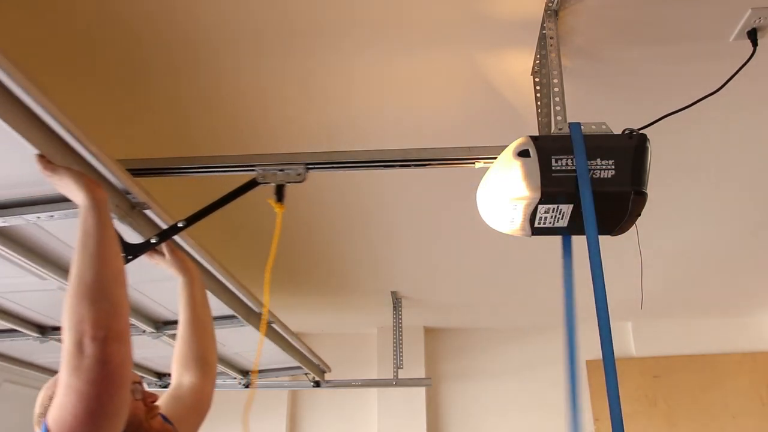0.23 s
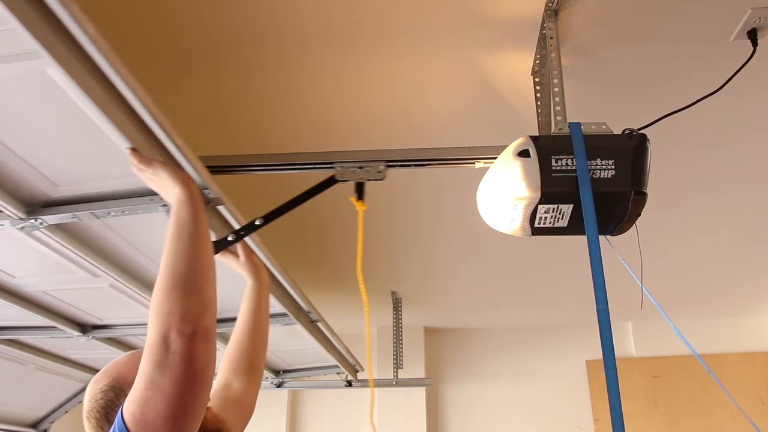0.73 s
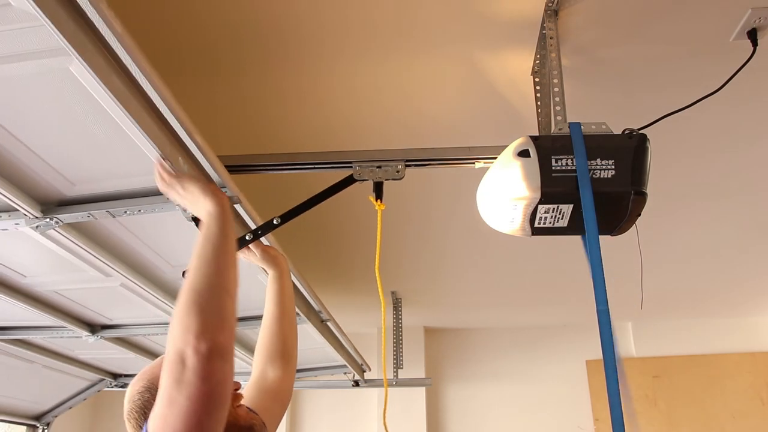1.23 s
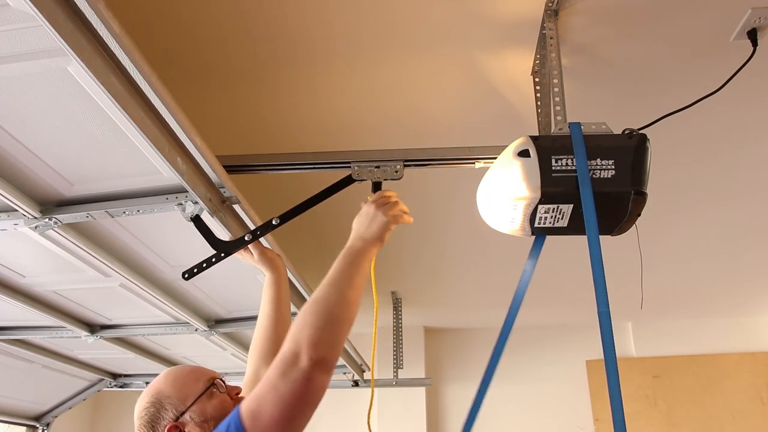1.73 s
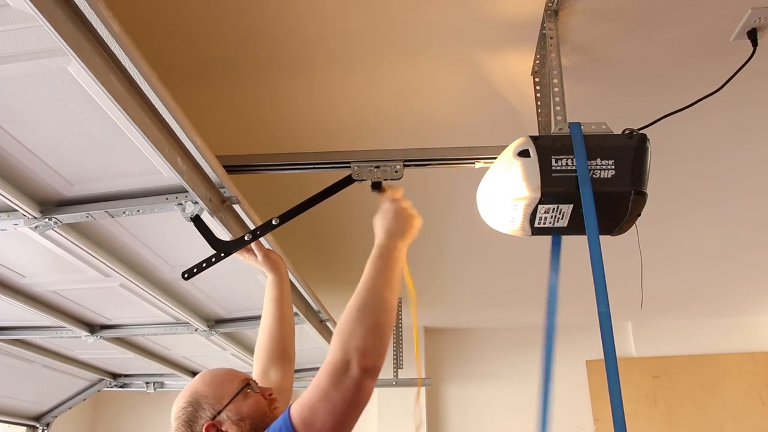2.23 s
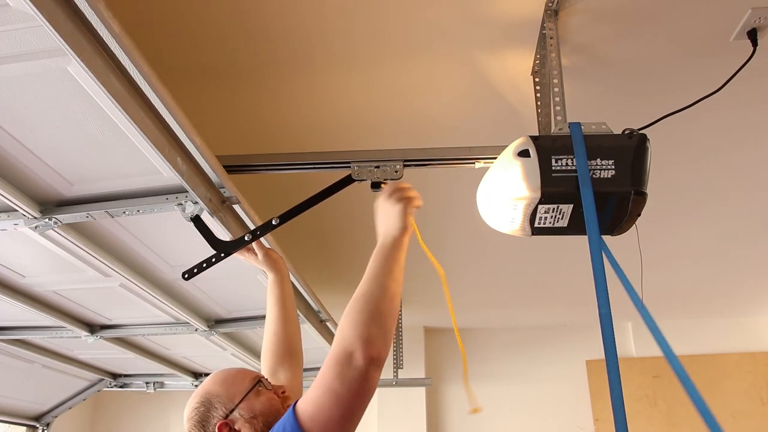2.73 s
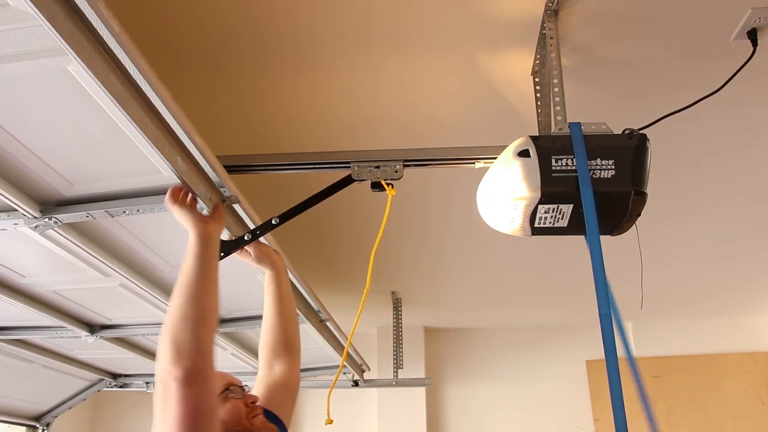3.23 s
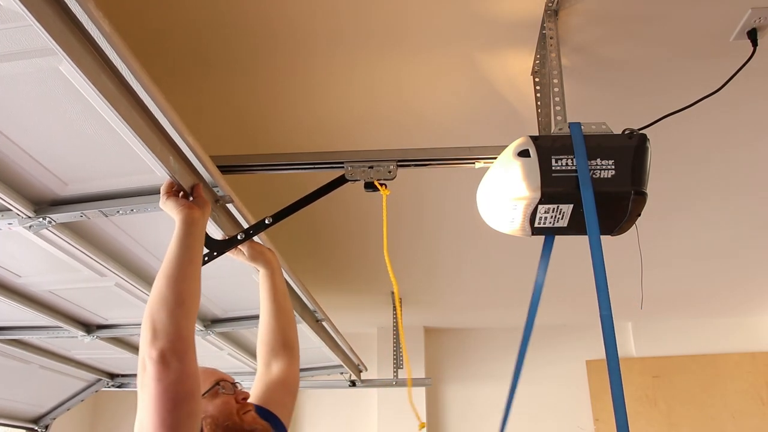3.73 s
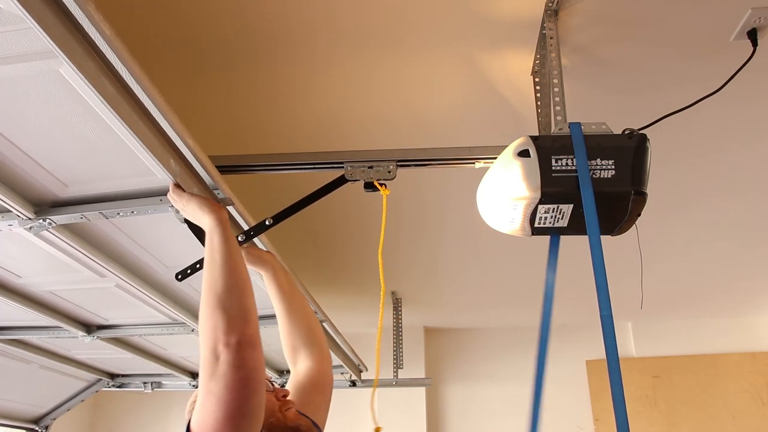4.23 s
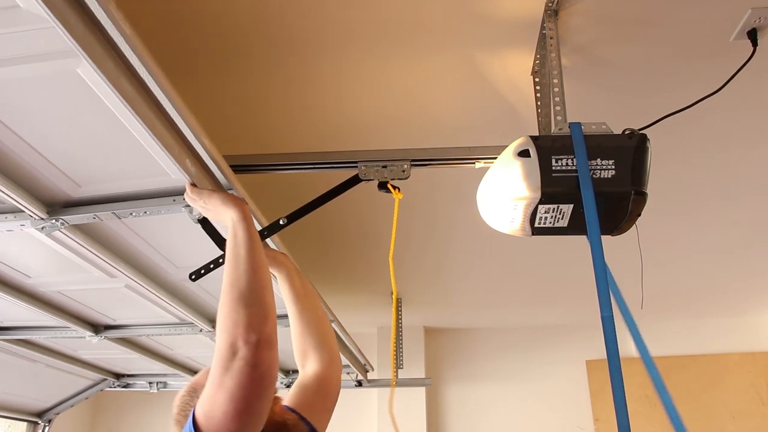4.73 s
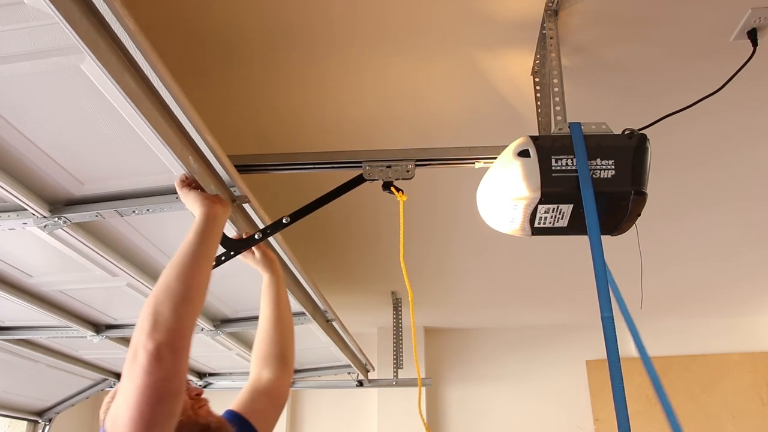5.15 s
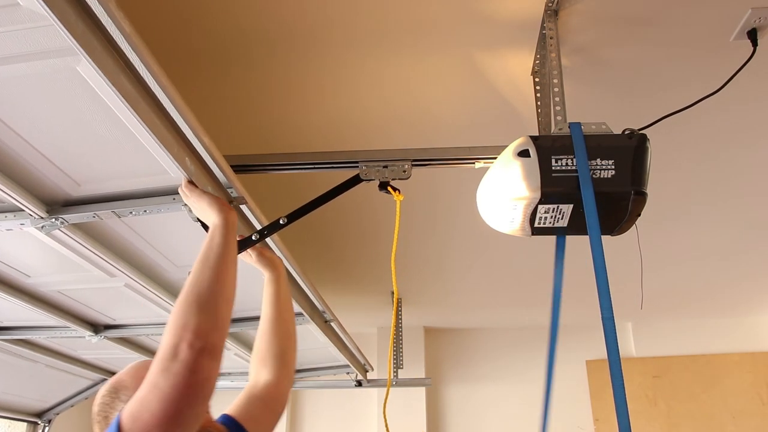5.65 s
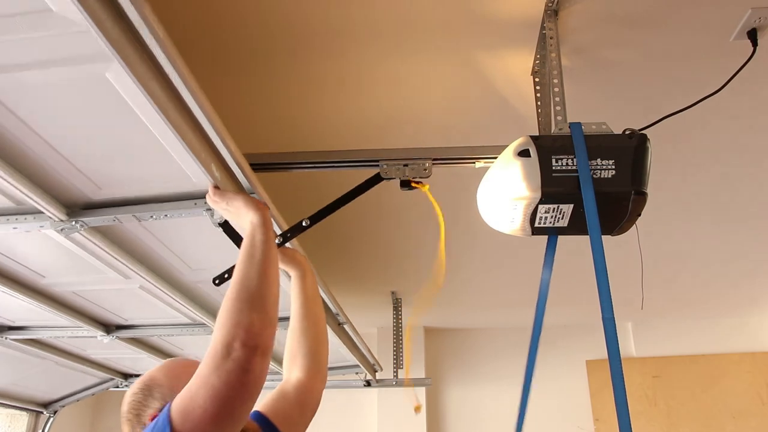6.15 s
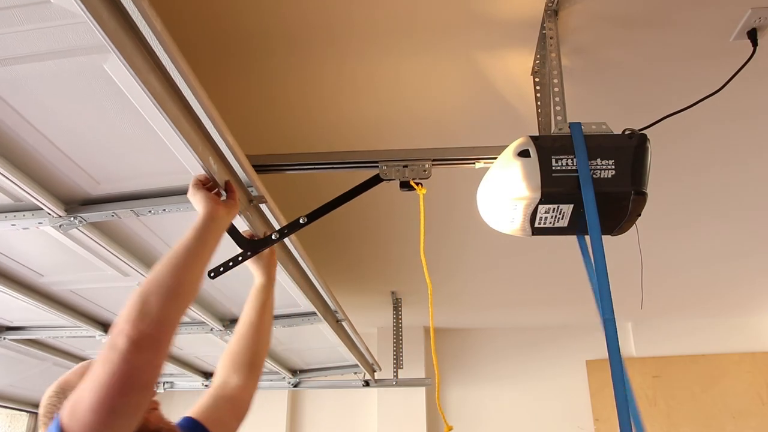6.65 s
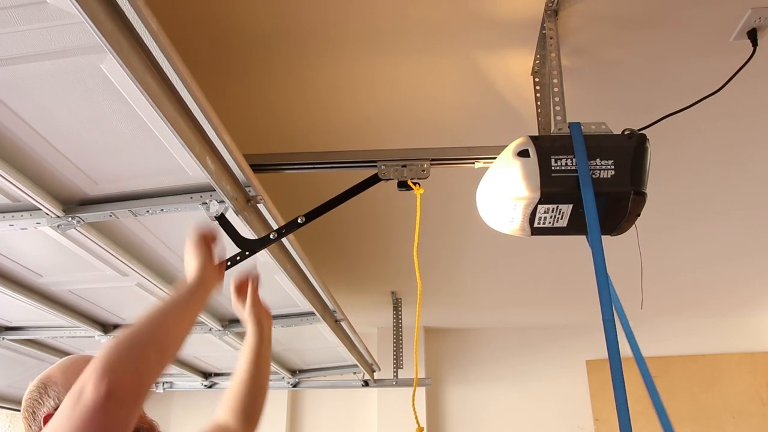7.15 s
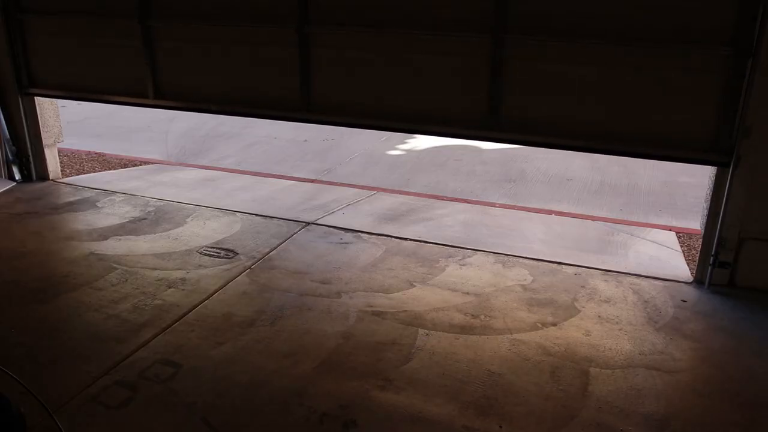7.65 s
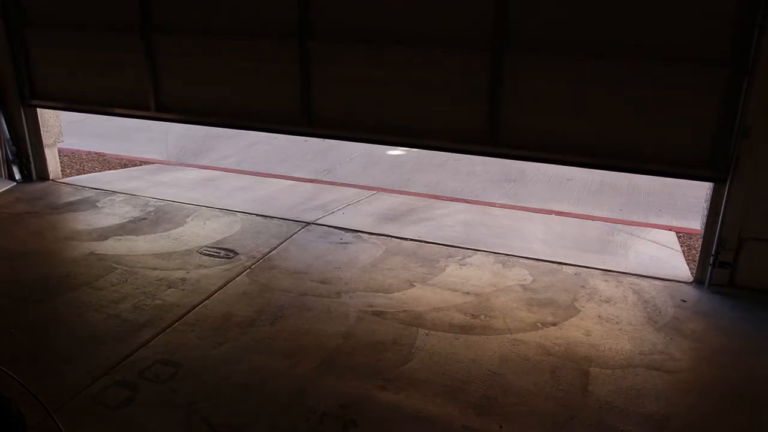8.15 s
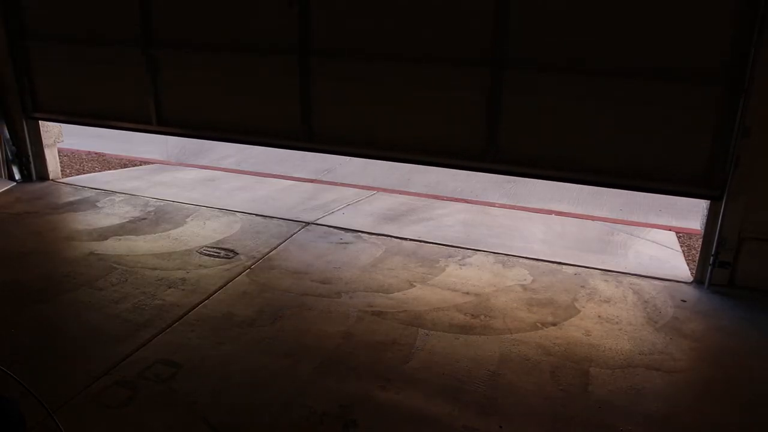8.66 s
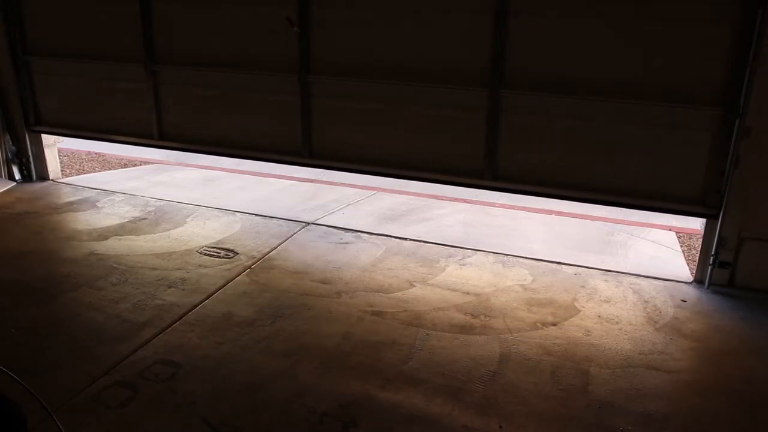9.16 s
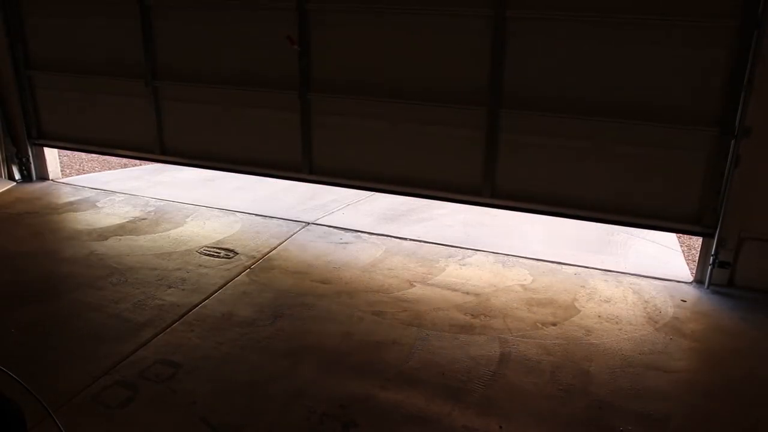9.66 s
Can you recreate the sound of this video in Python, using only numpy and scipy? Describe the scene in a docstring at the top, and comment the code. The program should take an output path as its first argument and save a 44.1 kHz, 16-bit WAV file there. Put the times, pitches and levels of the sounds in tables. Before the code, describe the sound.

Close indoor sound with short bright reverberation: rolling rumble and two hard knocks first, a quieter pause, then clicks and a crisp latch snap. Faint scrapes, small shoves and two pairs of clanking blows lead to one huge steel clunk and rattling slams. Rhythmic trolley ticks fade, and a motor drone with chain rattle takes over, steadily swelling, broken by knocks, a tiny squeak and roller grinding.

```python
"""Rollers rumble and hinges knock as a sectional steel garage door is pushed along overhead by hand.
Release latch and arm clank; then the trolley catches with a loud clunk and the panels shudder.
An electric opener follows, motor humming and chain rattling, and lowers the door in a bare, ringing garage.
Rolling is filtered noise from many small contacts; blows are noise bursts with decaying modes.
Friction is noise through resonances, the motor a set of wavering sines, and the walls a decaying noise tail."""
import sys
import numpy as np
from scipy import signal
from scipy.fft import rfft, irfft, next_fast_len
from scipy.io import wavfile
from scipy.ndimage import map_coordinates

SR = 44100
rng = np.random.default_rng(int(sys.argv[2]) if len(sys.argv) > 2 else 0)


def transcribe(signal):
    """Save signal, clipped to [-1, 1], as a 16-bit WAV file at the path in sys.argv[1]."""
    frames = np.atleast_2d(signal).T
    limited = np.clip(frames, -1, 1)
    pcm = np.round(limited * 32767).astype(np.int16)
    wavfile.write(sys.argv[1], SR, pcm)


N = 436149

CATCH_S, START_S = 6.15, 7.362  # the trolley catches; the opener starts
TOP_HZ = 16300  # upper band limit

# Decay of the walls' reverberation. Each row: frequency in Hz, t60 in s.
WALL_DECAY = [(100, 1), (300, 0.83), (800, 0.47), (2000, 0.56), (5000, 0.38), (13000, 0.3)]

# Spectra of blows, hand rolling, shuddering and chain drive. Each row: frequency in Hz, relative level in dB.
BLOW_SPECTRUM = [(60, -17), (130, 2.5), (265, 8), (600, 0), (1170, -4), (2100, -7.5), (2800, -12.5),
                 (3790, -10.5), (5050, -14), (6590, -16), (16000, -28)]
ROLL_SPECTRUM = [(15, -50), (25, -10.5), (92, 5.5), (130, 3), (249, -6), (405, -12), (641, -14.5),
                 (1480, -14), (2280, -23.5), (3620, -22), (4490, -31.5), (13600, -47.5), (16000, -56)]
SHAKE_SPECTRUM = [(15, -44), (25, -17), (48, -3), (110, -3), (223, -1.5), (405, 4), (640, -0.5), (820, 0),
                  (2280, -8.5), (3900, -7), (5730, -21.5), (7310, -23), (11000, -35), (16000, -33)]
CHAIN_SPECTRUM = [(15, -43), (25, -8.5), (64, 2), (256, -1), (293, 2.5), (350, -0.5), (405, -5),
                  (734, -11.5), (1260, -9), (2690, -24), (3750, -21), (4400, -31), (11300, -49.5),
                  (16000, -62)]
# Spectrum of the crack of a slipping hinge pin. Each row: frequency in Hz, relative level in dB.
PING_SPECTRUM = [(1000, 0), (4500, 2), (8000, -3), (13000, -2), (16000, -21)]

# Modes of panels, arm, hinge pin, latch, and trolley with rail.
# Each row: nominal frequency in Hz, mean relative level in dB, t60 in s.
PANEL_MODES = [(308, -9.5, 0.46), (401, -4, 0.79), (497, -1.5, 0.68), (790, 1.5, 0.67), (931, -14, 0.77),
               (1048, 1.5, 0.41), (1168, 2, 0.41)]
ARM_MODES = [(178.7, 8, 0.3), (1185, -5.5, 0.32), (1290, -8, 0.24), (1370, -5.5, 0.29), (1650, -8.5, 0.26),
             (1890, -12, 0.28), (2380, -6, 0.19), (3004, -19, .16), (5100, -15, 0.2), (5310, -17, 0.22),
             (6100, -19, 0.17), (7220, -12.5, 0.15)]
PIN_MODES = [(5100, -8, .07), (5200, 6, 0.082), (5320, -4, .25), (7530, -10, .15), (12220, -12, .28)]
LATCH_MODES = [(1213, -7.5, 0.37), (1275, -4.5, 0.41), (1337, 2.5, 0.24), (1400, 0.5, 0.22),
               (1986, -8, 0.27), (2623, -1.5, 0.14), (3900, -8, .14), (4370, -8, 0.11), (4990, -9, 0.14)]
TROLLEY_MODES = [(924, 8, .15), (1880, -1, 0.12), (2730, -8, 0.18), (2830, -2, 0.098), (3100, -2, 0.22),
                 (3540, -5, 0.28), (3780, -4, 0.64)]

# Resonances of opener housing and rail, of the rail under the trolley, of loose hardware, and of the track.
# Each row: centre in Hz, width in Hz of one pass (two are applied), relative level in dB.
HOUSING_RESONANCES = [(298, 38, -7), (352, 54, -4), (743, 260, -14)]
RAIL_RESONANCES = [(1550, 1680, 6.5), (3200, 610, 0), (7300, 2200, -7), (11200, 2300, -10.5)]
HARDWARE_RESONANCES = [(2545, 110, -0.5), (3045, 150, 0), (3510, 310, 1.5), (3760, 280, 0.5),
                       (4300, 240, -7)]
TRACK_RESONANCES = [(1000, 460, 1.5), (1450, 230, 3.5), (2020, 510, 0), (2750, 340, -1.5),
                    (3540, 930, -4.5)]

# Blows. Each row: start in seconds, mid-band level in dB, hardness in dB, centre of the favoured band in Hz.
# Dull knocks of hinges and rollers:
HINGE_KNOCKS = [(0.7277, -19.5, 6, 1780), (.736, -28, -9.5, 746), (0.8185, -25.5, 7, 1760),
                (1.0804, -36.5, -4, 2180), (3.266, -49.5, 7, 3650), (3.3273, -41.5, 6.5, 1650),
                (3.6052, -46.5, -6, 2000), (3.9444, -36.5, 0, 1600), (4.35, -51, 3, 1030),
                (5.0848, -38, 2, 1550), (7.3605, -34, 3, 3500), (7.7897, -31.5, 4, 2040),
                (8.9855, -35, 8, 3380), (9.434, -32.5, -8.5, 1020), (9.576, -29.5, 6, 2800)]
# Sharp clicks of release lever, trolley and chain:
SHARP_CLICKS = [(1.8622, -48, 4.5, 4600), (2.0782, -54.5, 1, 4070), (2.204, -46, -3.5, 3380),
                (2.2765, -37.5, 9.5, 3360), (2.2825, -29.5, 0.5, 3400), (2.6209, -41.5, -3.5, 2600),
                (2.6788, -35.5, 1, 1220), (2.712, -44, 8, 4230), (2.7795, -35.5, 1, 1290),
                (2.793, -47.5, -5, 3000), (4.6254, -53, 6, 3900), (6.3425, -40, 14, 5500),
                (6.665, -35.5, -5, 1710), (7.4604, -35.5, 1, 3640), (9.205, -38.5, -0.5, 5500),
                (9.352, -38, -4, 3500)]
# Soft thuds of a panel settling against its track:
PANEL_THUDS = [(2.128, -45.5, 0.5, 710), (3.9185, -44, 4, 596), (5.3125, -45, -2, 810),
               (8.743, -36, -3.5, 1130)]
# The door arm striking its bracket:
ARM_CLANKS = [(4.6907, -31.5, 1, 1270), (4.8539, -31.5, 3, 1710), (5.8576, -34, -1, 1290),
              (5.9025, -30.5, 8, 1190)]
# The release latch snapping open and bouncing:
LATCH_SNAPS = [(2.3062, -21.5, 0.5, 1450), (2.3365, -28.5, -2, 1340)]
# The trolley slamming into its catch:
CATCH_CLUNK = [(6.1435, -12.5, -0.5, 2880)]
# Panels slamming against their hinges after the catch:
PANEL_SLAMS = [(6.2045, -19.5, -1, 1000), (6.289, -29, 4, 880)]

# Pings of the hinge pins. Each row: start in seconds, relative level in dB.
PIN_PINGS = [(.988, -55), (7.476, -37.5)]
# Ticks of the caught, rocking trolley.
# Each row: start in seconds, direct level in dB, hardness in dB, top of the treble in Hz.
TROLLEY_TICKS = [(6.597, -24.5, -5, 14000), (6.690, -29.5, 2, 14000), (6.784, -28, -1, 13000),
                 (6.876, -29.5, -28, 11000), (7.159, -35.5, 0, 7850), (7.2545, -42, 0, 8000)]
TICK_RISE_S = 0.0036

# Scrapes of hands, rollers and trolley; booms of flexing panels and rail; a roller's squeak.
# Each row: peak in seconds, half length in seconds, direct level in dB, centre in Hz.
SCRAPE_STROKES = [(.723, 0.0043, -41, 1700), (1.118, 0.017, -45, 3130), (1.23, 0.037, -57.5, 3680),
                  (3.36, 0.028, -47.5, 2200), (3.51, 0.04, -60.5, 5000), (5.16, 0.055, -52.5, 3380),
                  (5.355, 0.012, -54.5, 4370), (5.65, .06, -57.5, 3820), (6.413, 0.0072, -37.5, 6740),
                  (6.44, .04, -29, 1460), (8.02, 0.028, -40.5, 1710), (9.732, 0.019, -46, 6300)]
BOOM_STROKES = [(.94, 0.042, -36, 148), (2.12, 0.047, -47.5, 360), (2.42, 0.074, -44, 444),
                (2.738, 0.016, -32.5, 345), (2.76, .035, -46, 111), (2.81, .07, -39.5, 210),
                (2.85, 0.074, -45.5, 394), (4.735, .025, -40.5, 234), (5.337, 0.014, -45, 400),
                (6.31, 0.038, -26.5, 142), (6.55, 0.087, -30, 96)]
SQUEAK_STROKES = [(9.626, 0.004, -19, 2720)]

# Loose hardware rasping and chattering; rollers grinding through the bend of the track.
# Each row: peak in seconds, half length in seconds, direct level in dB.
HARDWARE_RASPS = [(3.52, 0.045, -55.5), (3.832, 0.011, -55), (6.28, 0.035, -37), (6.40, .018, -34.5),
                  (6.468, .026, -32.5), (8.995, .01, -37)]
ROLLER_GRINDS = [(9.598, .014, -29.5), (9.662, 0.027, -32), (9.725, .026, -32.5), (9.785, .024, -41.5)]

# Motor and gear tones. Each row: mean frequency in Hz, relative level in dB.
HUM_TONES = [(120, -47), (183, -42), (285.3, -42), (360, -46.5), (514, -48.5), (720.5, -44), (1001, -55)]

# Shoves by hand. Each row: start in seconds, length in seconds, strength in dB, extra rattle in dB.
HAND_SHOVES = [(0.0, 0.94, -43.5, 0.5), (2.28, .05, -65, -2), (3.35, 0.18, -51, 6), (3.786, 0.065, -66, 15),
               (4.678, 0.12, -42.5, -1), (5.1, 0.075, -47.5, 1), (5.416, 0.2, -66, 16.5),
               (5.87, 0.25, -44.5, 0.5)]
SHOVE_RISE_S, SHOVE_GAIN_DB_PER_S = 0.0027, 7.5
# Decay once the door is let go. Entries: rumble, panels, rattle, each in dB per second.
COAST_DECAYS = [25, 44, 43.5]
# Gains of the door held still. Entries: rumble, panels, rattle, each in dB.
REST_LEVELS = [-53.5, -55.5, -65.5]

# Shudder after the catch, rows for rumble and panels. Each row: peak in dB, rise in s, decay in dB per s.
JOLT_BANDS = [(-27, 0.043, 14.5), (-22, 0.1, 34)]
# Loose hardware rattles as the door swings back, over a faint chatter while it settles.
JOLT_RATTLE_S, JOLT_RATTLE_WIDTH_S, JOLT_RATTLE_DB = 6.40, 0.099, -35.5
SETTLE_DB, SETTLE_DB_PER_S = -36.5, 23

# Powered run, rows for rumble, panels and rattle, the last before slack is added.
# Each row: level at the start in dB, growth in dB per second as the door comes down.
RUN_BANDS = [(-43, 3), (-38.5, 1.23), (-44, 2.5)]
SLACK_DB, SLACK_S = 10.5, 0.35  # extra chain rattle at the start and its time constant


def amp(db):
    """Decibel law: amplitude ratio of a level."""
    return 10 ** (np.asarray(db) / 20)


def unit(x):
    """Normalisation to unit root-mean-square amplitude."""
    return x / np.sqrt(np.mean(x ** 2) + 1e-20)


def along(points, hz):
    """Interpolation of (Hz, value) points on a logarithmic frequency axis."""
    f, v = np.transpose(points)
    return np.interp(np.log(hz + 1), np.log(f + 1), v)


def wobble(rate):
    """Slow random modulation: a smooth curve through rate random knots a second."""
    knots = rng.standard_normal(int(N * rate / SR) + 4)
    grid = np.arange(0, N, 32)
    coarse = map_coordinates(knots, [grid * rate / SR])
    return np.interp(np.arange(N), grid, coarse)


def filtered(x, response):
    """Linear filtering: the spectrum of x is multiplied by a response of frequency."""
    size = x.shape[-1]
    padded = next_fast_len(size + 4096, real=True)
    hz = np.fft.rfftfreq(padded, 1 / SR)
    return irfft(rfft(x, padded) * response(hz), padded)[..., :size]


def coloured(x, spectrum):
    """Spectral shaping of x by a table of levels, at rms 1."""
    return unit(filtered(x, lambda hz: amp(along(spectrum, hz))))


def split(x, low_hz, high_hz):
    """Complementary crossover: low, middle and high parts sum to x."""
    def bands(hz):
        below_low = 1 / (1 + (hz / low_hz) ** 6)
        below_high = 1 / (1 + (hz / high_hz) ** 6)
        return np.array([below_low, below_high - below_low, 1 - below_high])
    return filtered(x, bands)


def add(track, s, sound):
    """Superposition: a sound is summed into a track from time s."""
    part = track[round(max(s, 0) * SR):][:len(sound)]
    part += sound[:len(part)]


def gate(start, rise):
    """Linear onset from 0 to 1, beginning at start and lasting rise seconds."""
    return np.clip((np.arange(N) / SR - start) / rise, 0, 1)


def since(start):
    """Elapsed time in seconds after start, 0 before it."""
    return np.maximum(np.arange(N) / SR - start, 0)


def bell(t, peak_s, width_s):
    """Gaussian envelope, 1 at its peak."""
    return np.exp(-((t - peak_s) / width_s) ** 2 / 2)


def resonance(hz, centre_hz, width_hz):
    """Damped oscillator: causal response of one resonance, 1 at its centre."""
    return 1j * hz * width_hz / (centre_hz ** 2 - hz ** 2 + 1j * hz * width_hz)


def body_response(body, hz):
    """Modal sum: the resonances of a body, each applied twice."""
    return sum(amp(db) * resonance(hz, centre, width) ** 2 for centre, width, db in body)


def ring(modes, t, looseness=1.8):
    """Modal decay: loose joints split each mode into a beating pair with wandering phase."""
    hz, db, t60 = np.transpose(modes)[:, :, None]
    level = db + 2 * rng.standard_normal(hz.shape)
    steps = rng.standard_normal((len(modes), len(t)))
    wander = np.cumsum(steps, axis=1) / np.sqrt(SR) * looseness  # in cycles
    partner_hz = hz * (1 + .03 * rng.standard_normal(hz.shape))
    main = np.sin(2 * np.pi * (hz * t + wander + rng.random(hz.shape)))
    partner = np.sin(2 * np.pi * (partner_hz * t - wander + rng.random(hz.shape)))
    pair = np.cos(np.pi / 5) * main + np.sin(np.pi / 5) * partner
    return np.sum(amp(level - 60 * t / t60) * pair, 0)


def hiss(level_db):
    """Stationary broadband noise: the microphone's faint steady hiss."""
    return amp(level_db) * coloured(rng.standard_normal(N), [(1000, 12.0), (5000, -9.0), (16000, -11)])


def echo():
    """Diffuse reverberation: the tail of bare walls, of energy 1, with its highest treble dying first."""
    hz, t, z = signal.stft(rng.standard_normal(SR), SR, nperseg=256)
    decay = amp(-60 * t / along(WALL_DECAY, hz)[:, None])
    tail = signal.istft(z * decay, SR, nperseg=256)[1]
    tail = np.pad(tail, (round(.003 * SR), 0))[:SR]  # the walls answer 3 ms late
    return tail / np.linalg.norm(tail)


def garage(x, wet_db):
    """Convolution with the room: direct sound plus the answer of the walls."""
    return x + amp(wet_db) * signal.fftconvolve(x, echo())[:len(x)]


def strokes(table, width, wet_db, grain_db):
    """Friction excitation: uneven noise swells and fades in a resonance whose width is a share of its pitch."""
    track, t = np.zeros(N), np.arange(SR * 3 // 2) / SR
    for s, length, db, centre_hz in table:
        lead = 3 * length  # the swell begins ahead of its peak
        slips = amp(grain_db * wobble(170.4)[:len(t)]) * rng.standard_normal(len(t))
        rub = unit(filtered(slips, lambda hz: resonance(hz, centre_hz, width * centre_hz) ** 2))
        add(track, s - lead, amp(db) * garage(rub * bell(t, lead, length), wet_db))
    return track


def rasps(table, body, slip_hz, spread_db, wet_db):
    """Stick-slip motion: slips at an uneven rate excite the resonances of a steel part."""
    track, t = np.zeros(N), np.arange(SR) / SR
    for s, length, db in table:
        lead = 3 * length
        rate = slip_hz * np.exp(.35 * wobble(slip_hz / 2)[:SR])
        turns = np.cumsum(rate) / SR
        sizes = amp(spread_db * wobble(slip_hz)[:SR])
        slips = sizes * np.exp(-3 * (turns % 1)) * rng.standard_normal(SR)
        rasp = unit(filtered(slips, lambda hz: body_response(body, hz)))
        add(track, s - lead, amp(db) * garage(rasp * bell(t, lead, length), wet_db))
    return track


def pings(table, modes, crack_db, crack_t60, wet_db):
    """Sudden slip: small steel parts crack and then ring in high modes."""
    track, t = np.zeros(N), np.arange(SR // 2) / SR
    for s, db in table:
        crack = coloured(rng.standard_normal(len(t)), PING_SPECTRUM) * amp(crack_db - 60 * t / crack_t60)
        add(track, s, amp(db) * garage(ring(modes, t, looseness=4.7) + crack, wet_db))
    return track


def ticks(wet_db, grain_db):
    """Resonant slip: each rock of the trolley is a brief gritty noise coloured by the rail."""
    track, t = np.zeros(N), np.arange(SR // 2) / SR
    envelope = t / TICK_RISE_S * np.exp(1 - t / TICK_RISE_S)
    for s, db, hard_db, top_hz in TROLLEY_TICKS:
        def response(hz):
            treble_tilt = amp(hard_db * hz / (hz + 4000))
            return body_response(RAIL_RESONANCES, hz) * treble_tilt / (1 + (hz / top_hz) ** 10)
        slips = amp(grain_db * wobble(670)[:len(t)]) * rng.standard_normal(len(t))
        slip = unit(filtered(slips, response))
        add(track, s, amp(db) * garage(slip * envelope, wet_db))
    return track


def blows(table, modes, ring_db, crack_t60, chatter_db, chatter_t60, focus_db, wet_db, body_db, edge_db, tip_db):
    """Impact: touch, crack, sheet chatter and modes; a harder blow has more edge and less body."""
    track, t = np.zeros(N), np.arange(SR) / SR
    attack = round(.03 * SR)  # span over which the band levels are set
    for s, db, hard_db, bright_hz in table:
        flutter = np.interp(t, np.arange(200) / 200, rng.standard_normal(200))
        touch = amp(tip_db - 60 * t / 0.019)
        crack = amp(-60 * t / crack_t60)
        chatter = amp(chatter_db - 60 * t / chatter_t60 + 2.9 * flutter)
        envelope = touch + crack + chatter
        # the walls return the contact as a diffuse wash, weaker in the treble
        wash = filtered(echo(), lambda hz: amp(wet_db) / np.sqrt(1 + (hz / 9000) ** 2))
        contact = rng.standard_normal(SR) * envelope + np.linalg.norm(envelope) * wash
        contact = contact.std() * coloured(contact, BLOW_SPECTRUM)
        ringing = amp(ring_db) * garage(ring(modes, t), wet_db - 4.0)
        struck = (contact + ringing) * (1 - np.exp(-t / 0.00069))
        # the spot that is struck favours one part of the spectrum
        struck = filtered(struck, lambda hz: 1 + amp(focus_db) * resonance(hz, bright_hz, 0.27 * bright_hz))
        parts = split(struck, 700, 4000)
        levels = db + np.array([body_db - hard_db, 0, edge_db + hard_db])
        add(track, s, amp(levels) / parts[:, :attack].std(axis=1) @ parts)
    return track


def rattle(rate, spread_db, wet_db):
    """Random impacts: small contacts of uneven size, rate a second, smeared by diffuse reverberation."""
    spread = amp(spread_db * np.clip(rng.standard_normal(N), -2, 2))
    sizes = (rng.random(N) < rate / SR) * spread
    power = signal.lfilter([1], [1, -np.exp(-1 / (0.0016 * SR))], sizes ** 2)
    wash = np.abs(signal.fftconvolve(power, echo() ** 2)[:N])
    return unit(np.sqrt(power + amp(wet_db) ** 2 * wash) * rng.standard_normal(N))


def door(gains, spectrum, contacts, panel_hz, throb_db):
    """Structure-borne sound: contacts shake the door into deep rumble, booming panels and bright rattle."""
    parts = split(coloured(contacts, spectrum), 226, panel_hz)
    return sum(gain * amp(throb_db * wobble(13)) * unit(part) for gain, part in zip(gains, parts))


def pushed(rumble_db, panel_db, rattle_db):
    """Rolling noise rising with speed: the door gathers speed under each shove and coasts to rest."""
    power = amp(REST_LEVELS)[:, None] ** 2 * np.ones(N)
    t = np.arange(2 * SR) / SR
    for start, length, db, extra_db in HAND_SHOVES:
        speed_db = db + SHOVE_GAIN_DB_PER_S * np.minimum(t, length)
        coasting_s = np.maximum(t - length, 0)
        band_levels = [rumble_db, panel_db, rattle_db + extra_db]
        for band, band_db, coast in zip(power, band_levels, COAST_DECAYS):
            gain = np.minimum(t / SHOVE_RISE_S, 1) * amp(speed_db + band_db - coast * coasting_s)
            add(band, start, gain ** 2)
    contacts = rattle(rate=370, spread_db=6.5, wet_db=10.5)
    return door(np.sqrt(power), ROLL_SPECTRUM, contacts, panel_hz=716, throb_db=2.0)


def shudder():
    """Free vibration: the jolt spreads through the panels, which go on shaking at their own modes."""
    contacts = rattle(rate=270, spread_db=3.5, wet_db=0.5)
    t = np.arange(SR) / SR
    sheet = np.zeros(N)
    add(sheet, CATCH_S, ring(PANEL_MODES, t) * (1 - np.exp(-t / 0.05)))
    gains = [gate(CATCH_S, rise) * amp(db - decay * since(CATCH_S + rise)) for db, rise, decay in JOLT_BANDS]
    swing = amp(JOLT_RATTLE_DB) * bell(np.arange(N) / SR, JOLT_RATTLE_S, JOLT_RATTLE_WIDTH_S)
    settling = gate(CATCH_S, rise=.03) * amp(SETTLE_DB - SETTLE_DB_PER_S * since(CATCH_S))
    gains.append(swing + settling)
    return amp(-21) * sheet + door(gains, SHAKE_SPECTRUM, contacts, panel_hz=1350, throb_db=1.1)


def opener():
    """Forced vibration: motor tones waver while the chain shakes the housing, rail and door."""
    links = rattle(rate=500, spread_db=1.0, wet_db=5.5)
    t = since(START_S)
    rumble, panels, chain = [amp(db + growth * t) for db, growth in RUN_BANDS]
    # the chain rattles harder until it has taken up its slack
    slack = amp(SLACK_DB * np.exp(-t / SLACK_S))
    rolling = door([rumble, panels, chain * slack], CHAIN_SPECTRUM, links, panel_hz=740, throb_db=0.6)
    drone = unit(filtered(links, lambda hz: body_response(HOUSING_RESONANCES, hz)))
    shaft_s = np.cumsum(1 + 0.00394 * wobble(9)) / SR  # time warped by uneven speed
    hum = sum(amp(db + 1.0 * wobble(16)) * np.sqrt(2) * np.sin(2 * np.pi * hz * shaft_s)
              for hz, db in HUM_TONES)
    return rolling + amp(-11.5) * panels * drone + amp(-6.0) * hum


def scene():
    """Superposition of sources: handling, catch and powered run in turn, with every blow and scrape on top."""
    friction = (strokes(SCRAPE_STROKES, width=0.72, wet_db=-4.5, grain_db=2.0)
                + strokes(SQUEAK_STROKES, width=0.077, wet_db=-10, grain_db=6.0))
    booms = strokes(BOOM_STROKES, width=0.35, wet_db=-4.0, grain_db=-0.5)
    grinding = (rasps(HARDWARE_RASPS, HARDWARE_RESONANCES, slip_hz=138, spread_db=2.5, wet_db=-2.5)
                + rasps(ROLLER_GRINDS, TRACK_RESONANCES, slip_hz=110, spread_db=3.0, wet_db=-1.5))
    hardware = (pings(PIN_PINGS, PIN_MODES, crack_db=4.5, crack_t60=0.036, wet_db=0.0)
                + ticks(wet_db=-1.5, grain_db=1))
    knocks = blows(HINGE_KNOCKS, PANEL_MODES, ring_db=-27, crack_t60=0.014, chatter_db=-9.5, chatter_t60=0.24,
                   focus_db=0.0, wet_db=4.5, body_db=-11.5, edge_db=-24, tip_db=-3)
    clicks = blows(SHARP_CLICKS, PANEL_MODES, ring_db=-42.0, crack_t60=0.042, chatter_db=-12.5,
                   chatter_t60=0.15, focus_db=0.5, wet_db=2.0, body_db=-5.0, edge_db=-10.5, tip_db=3)
    thuds = blows(PANEL_THUDS, PANEL_MODES, ring_db=-41, crack_t60=0.023, chatter_db=-10, chatter_t60=0.44,
                  focus_db=-1, wet_db=1.5, body_db=-1.0, edge_db=-22.5, tip_db=9)
    clanks = blows(ARM_CLANKS, ARM_MODES, ring_db=-7.5, crack_t60=0.025, chatter_db=-9.0, chatter_t60=0.2,
                   focus_db=-2.5, wet_db=-0.5, body_db=-7.5, edge_db=-17.5, tip_db=-1.5)
    snaps = blows(LATCH_SNAPS, LATCH_MODES, ring_db=-7.5, crack_t60=0.037, chatter_db=-18, chatter_t60=0.042,
                  focus_db=3.5, wet_db=-3.5, body_db=-14.0, edge_db=-9.0, tip_db=1)
    clunk = blows(CATCH_CLUNK, TROLLEY_MODES, ring_db=-13.5, crack_t60=0.079, chatter_db=-1.5,
                  chatter_t60=0.33, focus_db=-2.5, wet_db=-4.5, body_db=-16, edge_db=-9.5, tip_db=-6)
    slams = blows(PANEL_SLAMS, PANEL_MODES, ring_db=-14.5, crack_t60=0.04, chatter_db=-10, chatter_t60=0.2,
                  focus_db=7, wet_db=-1.5, body_db=-3, edge_db=-15.5, tip_db=-2)
    impacts = knocks + clicks + thuds + clanks + snaps + clunk + slams
    caught, running = gate(CATCH_S, rise=0.028), gate(START_S, rise=0.013)
    by_hand = (1 - caught) * pushed(rumble_db=1, panel_db=-2.0, rattle_db=-6.0)
    motion = by_hand + (1 - running) * shudder() + running * opener()
    return hiss(level_db=-64) + friction + booms + grinding + hardware + impacts + motion


def record(dry):
    """Soft saturation and band limiting: the highest peaks are rounded and nothing passes above TOP_HZ."""
    rounded = dry / (1 + np.abs(dry) ** 6) ** (1 / 6)
    return filtered(rounded, lambda hz: np.clip((TOP_HZ - hz) / 500, 0, 1) ** 2)


dry = scene()
out = record(dry)
transcribe(out)
```